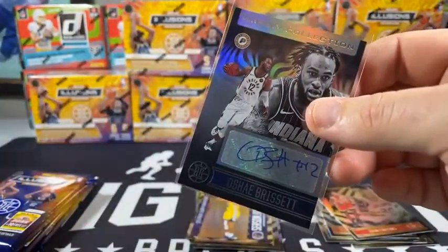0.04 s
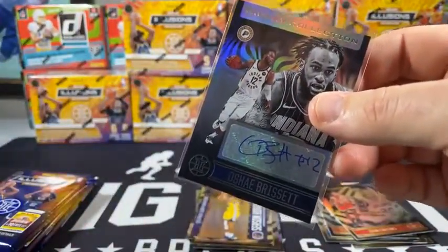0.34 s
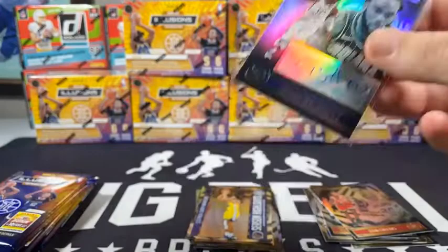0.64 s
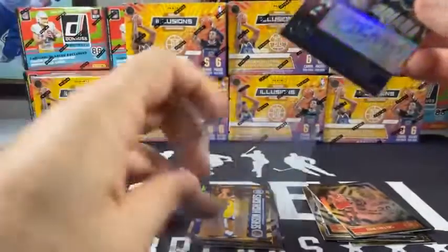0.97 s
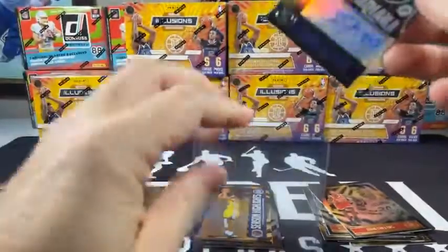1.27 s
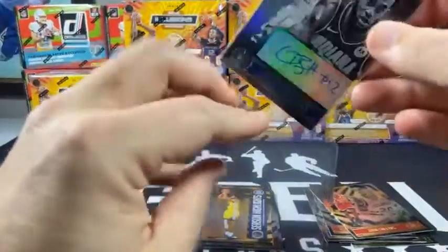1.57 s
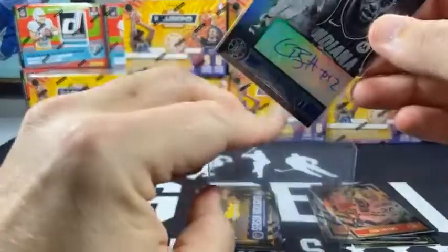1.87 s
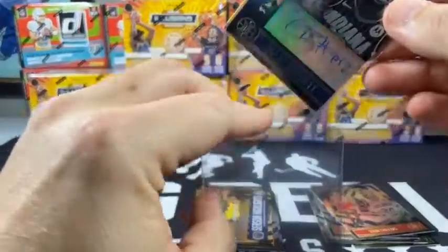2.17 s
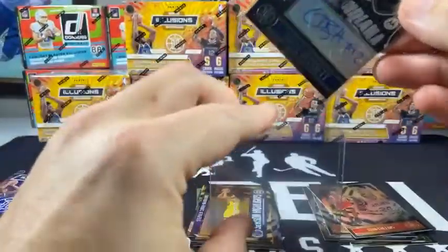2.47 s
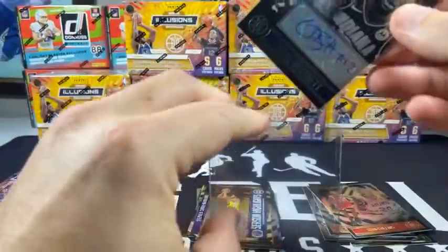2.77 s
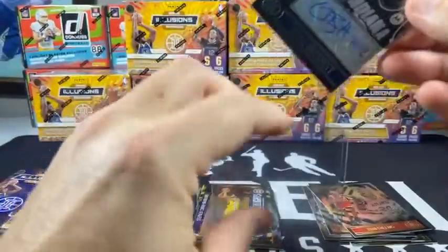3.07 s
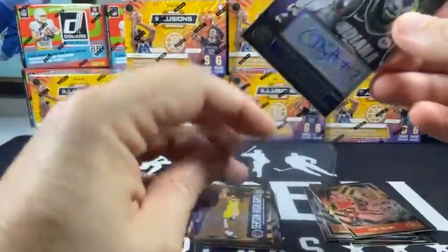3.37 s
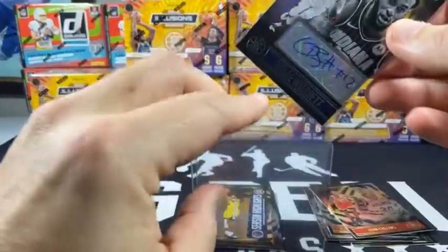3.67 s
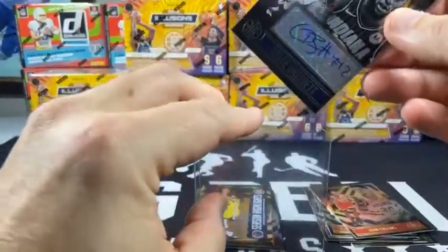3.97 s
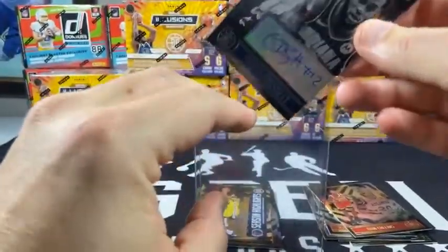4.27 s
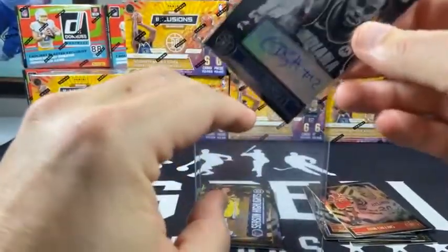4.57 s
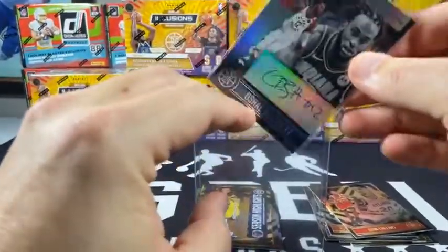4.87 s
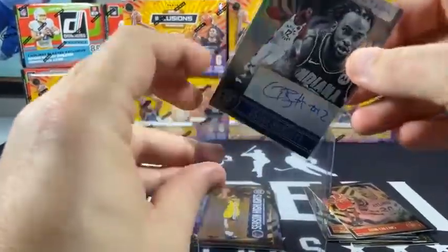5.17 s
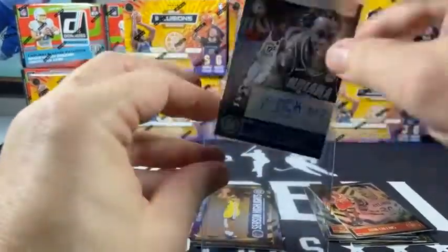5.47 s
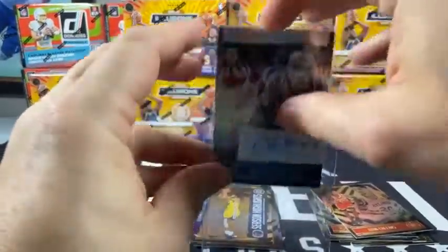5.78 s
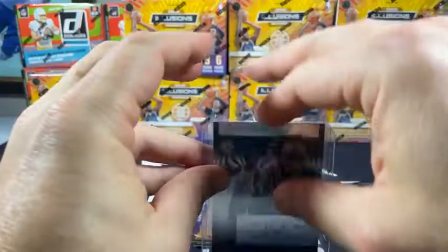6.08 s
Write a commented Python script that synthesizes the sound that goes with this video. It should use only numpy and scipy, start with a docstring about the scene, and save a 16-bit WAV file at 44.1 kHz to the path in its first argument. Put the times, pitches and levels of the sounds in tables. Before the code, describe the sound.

Close by, something hollow is dragged and set down, then fingers tick and rub on a plastic holder and a sleeved card slides in.

```python
"""At a mat-covered table, close by, a hollow object is dragged aside in stick-slip jerks and set down.
Fingers then shift a rigid plastic card holder: contacts and slipping edges ring it in ticks and snaps,
skin rasps and squeaks on it, and it bumps the mat, shaking the table.
Near 5.8 s a sleeved card slides into the slot in three pushes, with a bright friction hiss.
Throughout, ventilation rumbles in the small, quiet room."""
import sys
import numpy as np
from scipy import signal
from scipy.fft import rfft, irfft, next_fast_len
from scipy.io import wavfile
from scipy.ndimage import map_coordinates

SR = 44100
rng = np.random.default_rng(int(sys.argv[2]) if len(sys.argv) > 2 else 0)


def unload_wav(signal):
    """Save mono or channel-first audio to the path in sys.argv[1] as 16-bit WAV at rate SR, clipped to [-1, 1]."""
    wavfile.write(
        sys.argv[1],
        SR,
        np.round(np.clip(np.atleast_2d(signal).T, -1, 1) * 32767).astype(np.int16),
    )


N = 270321


def amp(db):
    """Decibels to gain."""
    return 10 ** (np.asarray(db) / 20)


def unit(x):
    """Scale to rms 1."""
    return x / np.sqrt(np.mean(x ** 2) + 1e-20)


def fade(t, t60):
    """A fall of 60 dB in t60 seconds."""
    return np.exp(-np.log(1000) * t / t60)


def swell(t, rise_s, fall_s):
    """A peak at t = 0, 20 dB down at rise_s before and fall_s after."""
    return 10 ** -(np.abs(np.where(t < 0, t / rise_s, t / fall_s)) ** 1.09)


def along(points, hz):
    """Interpolate (Hz, value) points on a log axis."""
    f, v = np.transpose(points)
    return np.interp(np.log(hz + 1), np.log(f + 1), v)


def wobble(per_s):
    """A smooth random curve, per_s knots a second."""
    knots = rng.standard_normal(int(N * per_s / SR) + 4)
    return map_coordinates(knots, [np.arange(N) * per_s / SR])


def butter(x, order, hz, kind="low"):
    """x through a Butterworth filter."""
    return signal.sosfilt(signal.butter(order, hz, kind, fs=SR, output="sos"), x)


def filtered(x, response):
    """x through a complex frequency response."""
    size = next_fast_len(len(x) + SR // 4)
    return irfft(rfft(x, size) * response(np.fft.rfftfreq(size, 1 / SR)), size)[:len(x)]


def coloured(x, spectrum):
    """x shaped by (Hz, dB) points, at rms 1."""
    return unit(filtered(x, lambda hz: amp(along(spectrum, hz))))


def ringing(x, modes):
    """x through (Hz, width Hz, dB) resonances of alternating sign."""
    return filtered(x, lambda f: sum(
        (-1) ** k * amp(db) * 1j * f * width / (hz * hz - f * f + 1j * f * width)
        for k, (hz, width, db) in enumerate(modes)))


def detuned(modes):
    """Each mode shifted at random by about 1.4 %."""
    return [(hz * amp(0.12 * rng.normal()), width, db) for hz, width, db in modes]


def add(track, start_s, sound):
    """Mix a sound into the track."""
    part = track[max(round(start_s * SR), 0):][:len(sound)]
    part += sound[:len(part)]


def friction(per_s, spread_db, smooth):
    """Tiny slips of uneven size over a share of smooth noise."""
    slips = (rng.random(N) < per_s / SR) * rng.choice([-1, 1], N)
    sizes = amp(spread_db * np.clip(rng.standard_normal(N), -2, 2))
    return unit(unit(slips * sizes) + smooth * rng.standard_normal(N))


# The object's hollow body. Each row: mode in Hz, width in Hz, gain in dB.
BODY_MODES = [(175, 11, 4.5), (301, 81, -0.5), (458, 80, -.5), (646, 77, -0.5), (872, 60, 7),
              (1040, 120, -1.5), (1250, 79, 2.5), (1530, 54, 1), (2840, 59, -9)]
# Each row: frequency in Hz, relative level in dB.
GRIT_SPECTRUM = [(800, -13), (1800, 4), (2800, 2.5), (3400, 2.5), (5600, -1), (6020, 1), (6500, 0.5),
                 (9000, -8), (12000, -10.5), (16000, -19.5)]
# Each row: start in seconds, skid level in dB, skid t60 in seconds, knock level in dB, knock in Hz.
DRAG_JERKS = [(0.0755, -45.5, 0.6, -24, 880), (0.1191, -42.5, 0.15, -31, 940), (0.176, -37, 0.16, -29, 830),
              (0.2182, -35, 0.08, -21.5, 1090), (.235, -42.5, 0.2, -40, 1230),
              (0.259, -24.5, 0.033, -8.5, 1240), (0.267, -40.5, 0.078, -51, 1480),
              (0.32, -50, 0.35, -31, 1430), (0.334, -51.5, 0.33, -29, 1430),
              (0.377, -49.5, 0.15, -41, 1260)]


def drag():
    """Stick-slip: each jerk breaks away with a knock, then juddering slips ring the hollow body."""
    out, t = np.zeros(N), np.arange(SR // 3) / SR
    judder_db, knock_t60_s = 4.5, 0.015
    slips = friction(per_s=1500, spread_db=3.5, smooth=0.55)
    slips = unit(slips * amp(judder_db * np.tanh(wobble(150))))
    grit = coloured(slips, GRIT_SPECTRUM)
    for start_s, skid_db, t60_s, knock_db, knock_hz in DRAG_JERKS:
        span = round(start_s * SR) + np.arange(len(t))
        skid = amp(skid_db) * (0.84 * fade(t, t60_s) + 0.86 * fade(t, 0.022)) * (1 - fade(t, 0.016))
        modes = detuned(BODY_MODES)  # the body tips and flexes
        body = butter(ringing(slips[span] * skid, modes), 2, hz=3200)
        body /= np.std(ringing(slips[span], modes))
        knock = np.sin(2 * np.pi * knock_hz * t) * fade(t, knock_t60_s) * (1 - fade(t, 0.0133))
        grit_db = -1.5 + 3.5 * np.log2(t60_s / 0.29)  # longer skids raise more grit
        add(out, start_s, body + amp(knock_db) * knock + amp(grit_db) * skid * grit[span])
    return out


# Each row: mode in Hz, width in Hz, gain in dB.
HOLDER_MODES = [(612, 50, 7.5), (1056, 73, 10), (1600, 97, 7.5), (2156, 185, 13), (3024, 280, 10),
                (4520, 140, 10.5), (5100, 620, 7), (7630, 3400, 8), (9850, 100000, -3)]
# Limits of the holder's body, wall and edge bands.
BAND_EDGES_HZ = [430, 1600, 5500, 16000]
# Each row: start in seconds, level in dB, brightness in dB, base t60 in seconds,
# favoured mode in Hz, its relative level in dB.
HOLDER_CONTACTS = [(0.0161, -47, 5.5, 0.016, 4780, -5.5), (0.1211, -46, -6, 0.015, 863, -3),
                   (.177, -46, -0.5, 0.053, 6020, 4), (0.4619, -46, 2, 0.037, 1224, -3.5),
                   (0.512, -65.5, 13, 0.011, 10540, 0), (0.572, -46.5, -1, 0.028, 810, 5),
                   (0.9835, -57, -1, 0.029, 1740, -15), (1.125, -58.5, -1.5, 0.025, 1650, -4),
                   (1.2193, -55.5, 1.5, 0.012, 1080, 0.5), (1.5354, -57.5, -2, 0.023, 1320, -2),
                   (2.2308, -51.5, 4, 0.0072, 1400, -3.5), (2.7349, -57.5, -5.5, 0.029, 2180, -3),
                   (2.749, -57, -4, 0.017, 2980, -7), (2.761, -58, -4, 0.021, 3050, -2),
                   (2.808, -52.5, -3, 0.037, 2220, -17), (3.298, -54.5, -6, 0.032, 603, 5),
                   (3.383, -43.5, -2.5, 0.018, 720, -5), (3.763, -51, -2, 0.018, 1590, -1.5),
                   (5.1049, -49.5, -1.5, 0.065, 4500, -3), (5.3556, -56.5, 3, 0.022, 8900, 0.5),
                   (5.667, -51.5, 0.5, 0.016, 2090, -7)]


def holder_clicks():
    """Each contact chatters and rings the holder; where it lands favours one mode and sets the colour."""
    out, t = np.zeros(N), np.arange(SR // 12) / SR
    energy_scale = np.sqrt(0.01 / t[-1])  # level as if all energy fell within 10 ms
    for start_s, level_db, bright_db, t60_s, ping_hz, ping_db in HOLDER_CONTACTS:
        chatter = rng.choice([-1, 1], len(t))
        modes = detuned(HOLDER_MODES)  # the grip changes
        ping_t60_s = min(2 * t60_s, 28 / ping_hz)
        ping = np.sin(2 * np.pi * ping_hz * t) * fade(t, ping_t60_s) * (1 - fade(t, t60_s / 5))
        contact = amp(ping_db) * unit(ping)
        cutoff_hz = np.clip(160 / t60_s, 3000, SR / 2.2)  # longer, softer contacts are duller
        bands = [(-bright_db, 1.6 * t60_s), (0, 0.21 * t60_s), (bright_db, 1.4 * t60_s)]
        for k, (band_db, band_t60_s) in enumerate(bands):
            blow = chatter * fade(t, band_t60_s) * (1 - fade(t, 0.19 * t60_s))
            tick = butter(unit(ringing(blow, modes)) + 0.4 * unit(blow), 1, cutoff_hz)
            contact += amp(band_db) * unit(butter(tick, 2, BAND_EDGES_HZ[k:k + 2], "band"))
        add(out, start_s, amp(level_db) * contact * energy_scale)
    return out


# Each row: landing in seconds, level in dB, centre in Hz.
EDGE_SNAPS = [(0.1822, -46.5, 6140), (.1955, -47, 1400), (.2198, -43.5, 2000), (0.258, -45, 4150),
              (0.277, -50, 7000), (0.337, -54, 3980), (0.8497, -49.5, 6540), (0.9657, -56, 1800),
              (1.025, -59, 2500), (1.094, -53.5, 4800), (1.411, -61, 1590), (1.472, -66.5, 6100),
              (2.2319, -40.5, 13500), (2.297, -66, 3000), (2.529, -63.5, 2250), (2.559, -73, 3800),
              (2.743, -54, 2090), (2.785, -60.5, 3200), (2.9527, -38.5, 2300), (3.024, -60, 2100),
              (3.309, -57, 5940), (3.771, -51, 1700), (5.21, -59, 6000), (5.26, -58.5, 2600),
              (5.447, -52, 11000), (5.483, -52, 11300), (5.683, -54, 10000), (5.9278, -40.5, 8600),
              (6.11, -47.5, 11000)]


def edge_snaps():
    """An edge lands and rebounds; a harder edge rings the holder's higher modes."""
    lead_s, rebound_s, rebound_db = 0.01, 0.00138, -6.5
    out, t = np.zeros(N), np.arange(SR // 12) / SR - lead_s
    energy_scale = np.sqrt(0.01 * SR / len(t))
    for land_s, level_db, centre_hz in EDGE_SNAPS:
        # a faint noise swells into each snap and softens its onset
        blow = 0.07 * rng.standard_normal(len(t)) * fade(np.abs(t), 0.016)
        add(blow, lead_s, np.ones(1))
        add(blow, lead_s + rebound_s, amp([rebound_db]))
        snap = ringing(ringing(blow, HOLDER_MODES), [(centre_hz, 0.58 * centre_hz, 0)])
        add(out, land_s - lead_s, amp(level_db) * unit(snap) * energy_scale)
    return out


# Each row: mode in Hz, t60 in seconds, gain in dB.
TABLE_MODES = [(63.2, 0.19, 0), (84, 0.089, 7), (135.5, 0.12, 10)]
# Each row: start in seconds, level in dB, starting pitch in Hz.
MAT_BUMPS = [(.265, -26, 570), (0.28, -28, 385), (.465, -33.5, 473), (.576, -25.5, 400), (0.589, -35, 292),
             (1.219, -33.5, 243), (1.232, -31, 230), (1.296, -39.5, 244), (1.641, -38, 235),
             (1.808, -46.5, 173), (2.303, -51, 152), (2.748, -34, 255), (2.812, -37, 355),
             (2.956, -26, 232.5), (3.525, -48.5, 135), (3.767, -39, 410), (5.111, -40.5, 317),
             (5.802, -50.5, 160)]


def mat_bumps():
    """A dead push that sinks in pitch as the mat gives way, a dull shudder, and the table's low modes."""
    out, t = np.zeros(N), np.arange(SR // 4) / SR
    sag_octaves, sag_s = 1.1, 0.011
    table = sum(amp(db) * np.sin(2 * np.pi * hz * t) * fade(t, t60) for hz, t60, db in TABLE_MODES)
    for start_s, level_db, hz in MAT_BUMPS:
        pitch_hz = hz * 2 ** (-sag_octaves * (1 - np.exp(-t / sag_s)))
        push = np.sin(2 * np.pi * np.cumsum(pitch_hz) / SR) * fade(t, 11 / hz)
        dull_spectrum = [(35, -20), (0.35 * hz, 0), (0.85 * hz, -1), (2.3 * hz, -20), (4000, -55)]
        shudder = coloured(rng.standard_normal(len(t)), dull_spectrum) * fade(t, 0.1)
        table_gain = 0.33 * amp(-7.5 - 19 * np.log2(hz / 249))  # lower bumps shake the table more
        thud = 1.26 * push + 0.3 * shudder + table_gain * table
        add(out, start_s, amp(level_db) * thud * (1 - fade(t, 0.013)))
    return out


# Each row of both: frequency in Hz, relative level in dB.
RASP_SPECTRUM = [(200, 3), (500, 1), (1100, -2), (1600, -2.5), (2200, -2), (2750, -8), (3130, -3),
                 (3500, -6.5), (6000, -9.5), (8500, -25.5), (14000, -35)]
HISS_SPECTRUM = [(3000, -6.5), (6500, -8), (9000, -1.5), (10200, -3), (11500, -4.5), (15500, -3.5)]
# Each row: peak in seconds, length in seconds, level in dB, relative hiss in dB,
# squeak in Hz, relative squeak in dB.
FINGER_STROKES = [(0.026, 0.09, -56, -6, 2200, -8), (0.524, 0.28, -74.5, 12.5, 3100, -13),
                  (0.679, 0.072, -73, 11.5, 2160, 5.5), (0.804, 0.24, -69, 2, 5850, -2),
                  (1.045, 0.27, -66.5, 4.5, 2570, -14), (1.223, 0.054, -52, -4.5, 3200, -11),
                  (1.278, 0.053, -58, -8, 2870, -11), (1.349, 0.2, -64.5, -3.5, 3040, -16),
                  (1.521, 0.094, -68, 8, 3240, -3), (1.607, 0.021, -72, -25, 1170, 21.5),
                  (1.632, 0.15, -58.5, -6, 3050, -14), (1.825, 0.089, -52.5, -1, 3030, -6),
                  (1.973, 0.14, -60.5, -6.5, 3050, -5), (2.043, 0.28, -65.5, -8.5, 6360, -6.5),
                  (2.177, 0.055, -70, -1, 3180, 1), (2.573, 0.046, -60.5, -12, 3080, -4),
                  (2.761, 0.14, -62, -8, 3000, -5), (3.013, 0.072, -60, -6, 2980, -19),
                  (3.128, 0.088, -64.5, -16, 1620, -5), (3.259, 0.14, -55.5, -13, 3180, -20),
                  (3.355, 0.069, -52, -11, 2180, -15), (3.522, 0.045, -54, -3, 2950, -6),
                  (3.64, 0.31, -70.5, -10, 3390, -16), (4.124, 0.025, -52, -15.5, 3100, -4),
                  (4.799, 0.094, -64.5, 1.5, 4110, -2), (4.93, 0.1, -74.5, 22.5, 4450, -6),
                  (4.962, 0.078, -74, 2, 4450, 15.5), (5.18, 0.17, -65, 3.5, 4430, -18),
                  (5.239, 0.05, -53.5, -2, 1010, -5), (5.354, 0.22, -69, 9, 2800, -8),
                  (5.481, 0.13, -70.5, 12.5, 2890, 3), (5.668, 0.04, -59.5, 6.5, 3530, -20),
                  (6.102, 0.035, -54, -3, 2110, -12)]


def finger_rubs():
    """Skin creeps over plastic: a grainy rasp, a finer hiss, and a squeak whose pitch the grip sets."""
    out, t = np.zeros(N), np.arange(SR * 3 // 4) / SR - 0.25
    squeak_q, lift_s = 20, 0.012
    slips = friction(per_s=1800, spread_db=3.5, smooth=0.8)
    grip = amp(1.8 * wobble(130) + 1.2 * wobble(35))
    rasp = grip * coloured(slips, RASP_SPECTRUM)
    hiss = grip * coloured(slips + rng.standard_normal(N), HISS_SPECTRUM)
    for peak_s, length_s, level_db, hiss_db, squeak_hz, squeak_db in FINGER_STROKES:
        span = np.clip(np.round((peak_s + t) * SR).astype(int), 0, N - 1)
        squeak = unit(ringing(rng.standard_normal(len(t)), [(squeak_hz, squeak_hz / squeak_q, 0)]))
        rub = 0.95 * rasp[span] + amp(squeak_db) * squeak + amp(hiss_db) * hiss[span]
        pressure = swell(t, rise_s=0.038 / 0.11 * length_s, fall_s=0.76 * length_s)
        touch = (1 - np.tanh((t - 0.85 * length_s) / lift_s)) / 2  # the finger lifts
        add(out, peak_s + t[0], amp(level_db) * rub * pressure * touch)
    return out


# Each row: frequency in Hz, relative level in dB.
SLEEVE_SPECTRUM = [(710, -54), (1200, -31), (1610, -20), (2250, -13.5), (3050, -7.5), (3660, -6.5),
                   (3910, -10.5), (5970, 1.5), (7740, 4.5), (10900, -5), (15300, -3), (16200, -14.5)]
# Each row: peak in seconds, level in dB, length in seconds.
CARD_PUSHES = [(5.786, -46.5, 0.11), (6.002, -44.5, 0.25), (6.12, -46, 0.28)]


def card_slide():
    """The smooth sleeve slides between the holder's walls in a dense, bright stream of slips."""
    t = np.arange(N) / SR
    speed = sum(amp(level_db) * swell(t - peak_s, 0.53 * length_s, 0.47 * length_s)
                for peak_s, level_db, length_s in CARD_PUSHES)
    slips = friction(per_s=4500, spread_db=3, smooth=0.6)
    flicker = amp(1.3 * wobble(80))
    return speed * flicker * coloured(slips, SLEEVE_SPECTRUM)


# Each row: frequency in Hz, t60 in seconds.
ROOM_DECAY = [(150, 0.33), (1500, 0.37), (3500, 0.2), (7000, 0.14), (15000, 0.21)]


def reverb(x):
    """The small room answers after 5 ms with a short tail that dies sooner in the treble."""
    hz, t, noise = signal.stft(rng.standard_normal(SR // 3), SR, nperseg=256)
    tail = signal.istft(noise * fade(t, along(ROOM_DECAY, hz)[:, None]), SR, nperseg=256)[1]
    response = np.pad(tail / np.linalg.norm(tail), (SR // 200, 0))
    return signal.fftconvolve(x, response)[:N]


# Each row: frequency in Hz, relative level in dB.
VENTILATION_SPECTRUM = [(25, -12.5), (40, -7.5), (58, 5), (99, -2), (130, 3.5), (250, -5.5), (400, -7.5),
                        (630, -17), (850, -23.5), (1400, -23.5), (1950, -28.5), (2450, -40.5), (4200, -44),
                        (16000, -53.5)]


def ventilation():
    """Steady ventilation rumble with a faint hiss."""
    level_db = -55.5 + 0.12 * wobble(10)
    return amp(level_db) * coloured(rng.standard_normal(N), VENTILATION_SPECTRUM)


def scene():
    """The handling, its weak echo and the ventilation, in mono."""
    near = drag() + holder_clicks() + edge_snaps() + mat_bumps() + finger_rubs() + card_slide()
    return (near + amp(-16) * reverb(near) + ventilation())[None]


def record(dry):
    """The microphone passes 45 Hz to 16.1 kHz."""
    lean = butter(dry[0], 4, hz=45, kind="high")
    return filtered(lean, lambda hz: hz < 16100)[None]


dry = scene()
out = record(dry)
unload_wav(out)
```